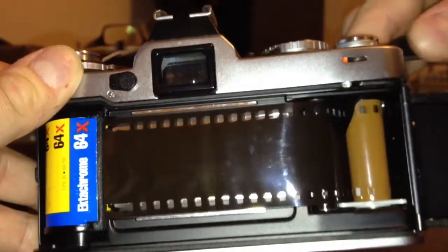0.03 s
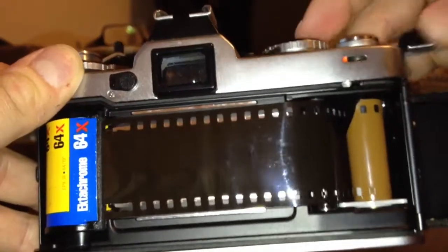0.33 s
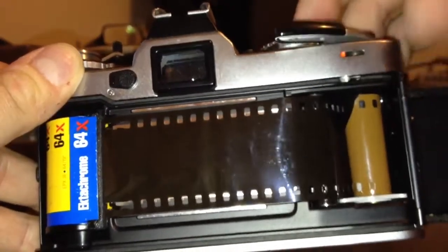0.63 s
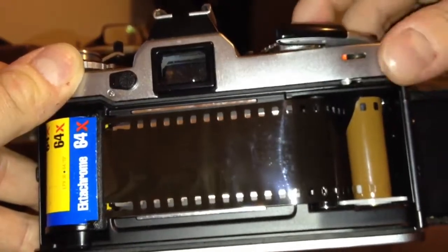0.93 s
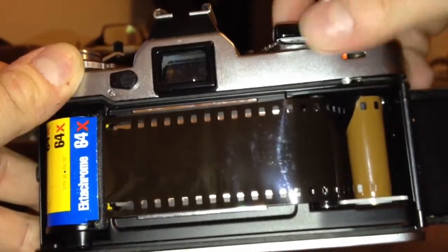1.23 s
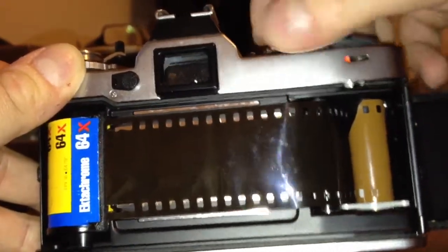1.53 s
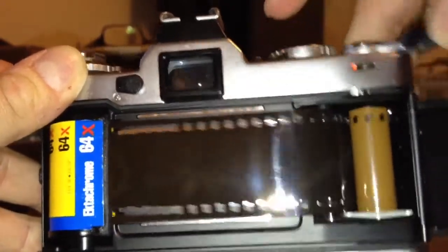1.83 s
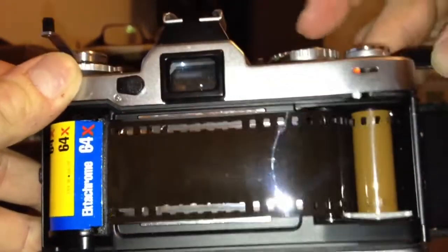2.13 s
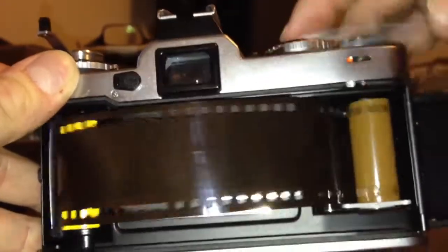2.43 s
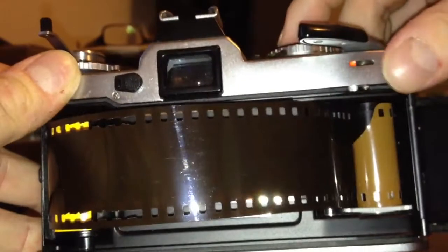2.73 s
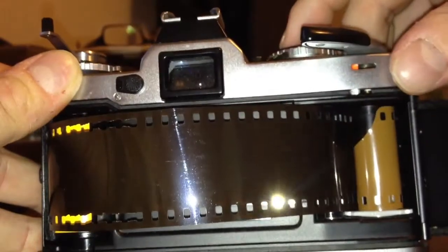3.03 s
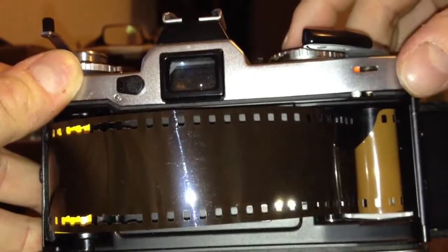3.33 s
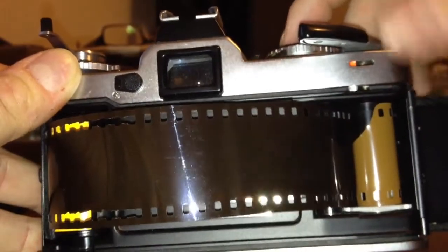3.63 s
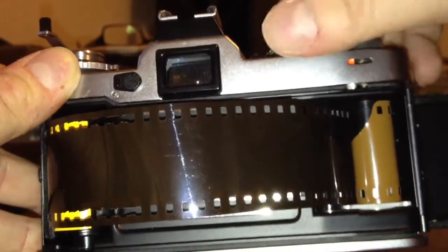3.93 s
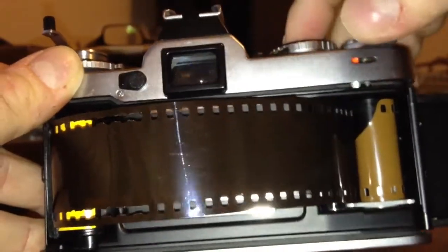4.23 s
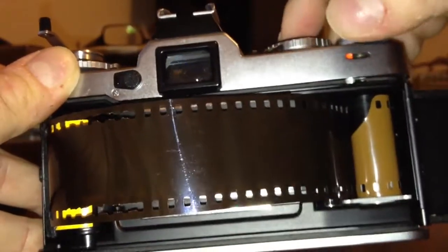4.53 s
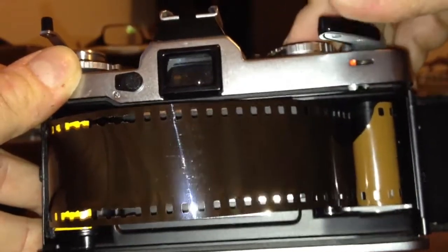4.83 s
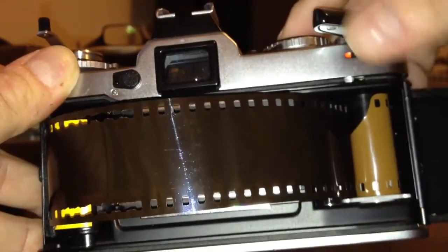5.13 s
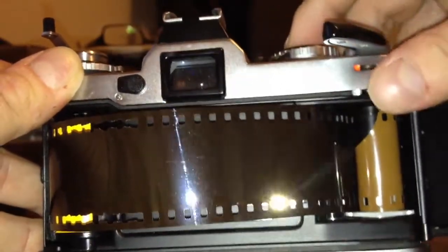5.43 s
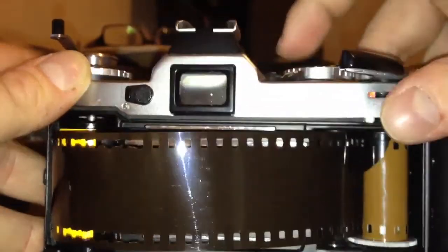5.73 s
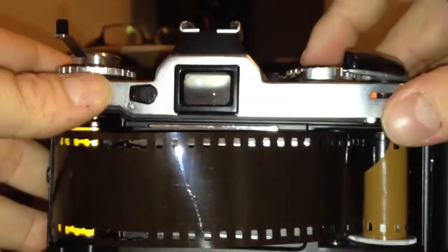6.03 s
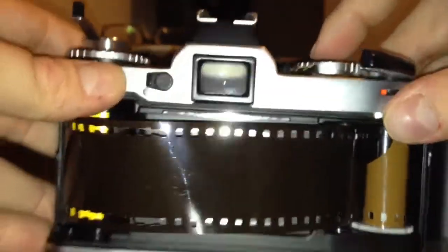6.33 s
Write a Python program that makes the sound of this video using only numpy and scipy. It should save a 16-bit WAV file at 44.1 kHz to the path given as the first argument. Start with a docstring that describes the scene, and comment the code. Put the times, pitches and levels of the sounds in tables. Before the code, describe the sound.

Close by in a small, quiet room, a film camera's winding lever whirrs and snaps, leaving a faint spring ring. The mirror clicks up and the shutter fires with a sharp clack. Winding follows, with ticking gears, softly hissing film and a rasping rattle from the cassette. After a lull the mirror and shutter fire again, then come finger bumps, a bright metallic ping and a last knock.

```python
"""Sharp clicks, short whirrs and a soft rasp: a film camera with its back open is wound and fired twice
by hand, close by in a small, quiet room. Latches, mirror and shutter curtains click as they strike the
frame, the plates and small steel parts. Gears whirr, springs ring, a dial pings, film slides over its
rails and jolts its cassette, and fingers bump the body."""
import sys
import numpy as np
from scipy import signal
from scipy.fft import rfft, irfft
from scipy.io import wavfile
from scipy.ndimage import uniform_filter1d

SR = 44100
rng = np.random.default_rng(int(sys.argv[2]) if len(sys.argv) > 2 else 0)


def digitize_waveform(pressure):
    """Quantize a signal to 16-bit integers and store it at the path in sys.argv[1].

    Rows of a 2-D input are taken as channels; values are limited to [-1, 1].
    """
    field = np.atleast_2d(pressure).T
    bounded = np.clip(field, -1, 1)
    quanta = np.round(bounded * 32767).astype(np.int16)
    wavfile.write(sys.argv[1], SR, quanta)


N = 291060
TIME = np.arange(N) / SR

# The tone colour of the room's hush and of sliding film: pitch_hz, relative_db
ROOM_COLOUR = [(18, -83), (30, -54.5), (85, -27.5), (110, -9.5), (216, -10), (267, -7), (384, -10),
               (426, -14), (524, -9.5), (662, -12.5), (928, -9.5), (2430, -25.5), (6880, -31.5),
               (10200, -34.5), (15000, -31.5)]
FILM_COLOUR = [(300, -14), (1000, 3), (2200, -0.5), (4700, -10), (6500, -3), (10300, -7), (11300, -2.5),
               (12400, -9), (15000, -12)]
# Faint hum and whine in the room: pitch_hz, width_hz, level_db
ROOM_HUM = [(123.7, 3.8, -73), (389, 5, -76), (534.2, 8.3, -68), (6900, 170, -86)]
# A mode is a pitch at which something likes to ring. These belong to the room's air and the camera's
# frame, plates, small steel parts and film cassette: pitch_hz, width_hz, gain_db
ROOM_MODES = [(138.5, 2, -2), (168, 5.5, 0.5), (201, 8.1, -11)]
FRAME_MODES = [(193.3, 63, -8), (329.7, 180, -9), (522, 240, -8.5), (706, 140, -3), (835, 90, -2.5),
               (968.4, 61, -1.5)]
PLATE_MODES = [(1296, 270, -2), (1632, 180, 0.5), (1974, 170, -1), (2230, 260, -2.5), (2597, 280, -2.5),
               (3180, 360, -6.5), (3900, 800, -7), (4682, 400, -4.5)]
STEEL_MODES = [(6150, 1400, -7), (6600, 270, -2), (7260, 350, -3), (8170, 520, -3.5), (8830, 470, -5.5),
               (10800, 1900, -7.5), (11860, 970, -1.5), (14300, 1300, -7), (15060, 1000, -8.5)]
CASSETTE_MODES = [(1434, 280, -6), (1995, 200, -0.5), (2584, 410, -3), (3490, 540, -7), (5670, 740, -9),
                  (7500, 1500, -11), (11660, 2100, -18)]
# Modes of the hand-held body: pitch_hz, fade_multiplier, gain_db
BODY_MODES = [(162, 0.99, -4.5), (214, 3.3, -5), (271, 1.5, -2), (375, 1, 0), (491, .6, -5), (577, 1, -2),
              (716, 0.56, -1), (865, 0.37, -7), (970, 0.94, -6.5), (1340, 0.36, -4), (1500, 0.73, -7)]

# The big moves (mirror goes up, shutter runs, winding lever hits its stop): start_s, gain_db
MIRROR_LIFTS = [(0.8348, -2), (4.7724, 2)]
SHUTTER_RUNS = [(0.993, -0.5), (4.9029, 0.13)]
LEVER_SNAPS = [(0.5005, 0.5), (2.4411, 1)]
# Loose parts ticking under the fingers: start_s, stop_s, ticks_per_s, level_db, centre_hz
LOOSE_TICKS = [(0.27, 0.47, 70, -60, 5660), (1.10, 1.20, 140, -60, 7600), (1.48, 1.61, 70, -57.5, 2400),
               (1.74, 1.98, 45, -50.5, 2300), (3.98, 4.04, 140, -63, 2180), (4.63, 4.66, 120, -64, 2780),
               (5.048, 5.13, 130, -58.5, 7200), (5.70, 5.786, 45, -52.5, 9500),
               (6.15, 6.45, 45, -56.5, 4730)]
# Film sliding on its rails, and dragging its cassette round: start_s, level_db, rise_s, hold_s, fall_s
FILM_SLIDES = [(1.60, -53, 0.066, 0.40, 0.076), (5.68, -55, 0.13, 0.022, 0.47),
               (6.17, -57.5, 0.13, 0.01, 0.22)]
CASSETTE_PULLS = [(2.25, -42.5, 0.038, 0.014, 0.049), (2.322, -38, 0.031, 0.088, 0.05),
                  (2.47, -55.5, 0.014, 0.05, 0.026)]
# The cassette bumping its chamber: start_s, level_db
CASSETTE_JOLTS = [(2.2835, -40), (2.288, -36), (2.3435, -31.5), (2.3512, -28.5), (2.362, -31.5),
                  (2.3861, -30.5), (2.4071, -30), (2.413, -33), (2.4252, -32), (2.4335, -23.5),
                  (2.490, -34.5), (2.5005, -39), (2.5041, -35), (2.5298, -36.5), (2.5402, -38),
                  (2.5445, -37)]
# Ringing metal (springs singing on, and the ping of a dial click): start_s, pitch_hz, level_db, fade_s
METAL_RINGS = [(0.502, 2309, -50, 0.92), (0.502, 1680, -51, 0.6), (0.502, 4597, -58, 0.22),
               (0.502, 6072, -50, 0.19), (1.028, 1007, -53, 0.33), (1.588, 2330, -52, 0.41),
               (4.081, 2309, -67.5, 0.73), (5.832, 1680, -21.5, 0.05), (5.832, 2630, -35, .025),
               (5.832, 4330, -32, 0.018), (5.832, 6350, -31, 0.02), (5.833, 6900, -28.5, 0.029),
               (6.311, 4600, -45, .17)]
# Fingers and lever bumping the body: start_s, base_level_db, centre_hz, base_fade_s
HAND_KNOCKS = [(0.836, -43, 198, 0.048), (1.995, -34, 260, 0.042), (2.091, -44.5, 136, 0.11),
               (4.178, -45.5, 260, .05), (5.617, -37.5, 225, 0.062), (5.642, -38.5, 305.4, 0.055),
               (5.664, -35, 188, 0.046), (5.819, -33.5, 194, 0.036), (5.898, -36, 195, 0.033),
               (6.2903, -22, 654, 0.078), (6.338, -38.5, 680, 0.2), (6.4553, -44.5, 550, 0.068)]
# The body's recoil in each shutter run: delay_s, base_level_db, centre_hz, base_fade_s
SHUTTER_KNOCKS = [(0.006, -38, 174, 0.08), (0.033, -41, 151.8, 0.13)]
# Gears turned by the lever: start_s, level_db, speed_up_s, run_down_s, steel_offset_db
WINDING_GEARS = [(0.318, -47, 0.013, 0.023, 3.5), (0.467, -48, 0.025, 0.0064, 5),
                 (0.501, -33.5, 0.0081, 0.036, -2.5), (2.000, -45.5, 0.0092, 0.043, -1.5),
                 (2.044, -37.5, 0.023, 0.03, -0.5), (2.441, -42.5, 0.0085, 0.024, -4)]
# Gears in each mirror lift and shutter run: delay_s, then the same columns
MIRROR_GEARS = [(0.006, -37.5, 0.025, 0.03, 3.5)]
SHUTTER_GEARS = [(-0.002, -31, 0.018, 0.015, 5.5), (0.027, -31, 0.013, 0.03, 0),
                 (0.067, -41, 0.01, 0.028, -3.5)]
# Lever, ratchet and dial clicks: start_s, base_level_db, frame_offset_db, steel_offset_db, base_fade_s
SINGLE_CLICKS = [(0.0054, -35, -11, 5.5, 0.13), (0.0125, -48, 0.5, 25, 0.0046),
                 (0.0338, -36.5, -1, 9, 0.05), (0.3139, -37, -13, -6.5, 0.04),
                 (0.3369, -54.5, 9.5, 10.5, 0.016), (0.5196, -24.5, -13.5, 2.5, 0.0079),
                 (1.2052, -48.5, -10, 3, 0.019), (1.6135, -46, -2, -1, 0.0098),
                 (1.6307, -37, -15, 0, 0.012), (1.646, -48, 1.5, 10, 0.016), (1.686, -38, -13, -0.5, 0.021),
                 (1.6953, -32.5, -11, -6, 0.03), (1.733, -45, 1, 7.5, 0.012),
                 (1.8851, -43, -4.5, -20, 0.022), (1.9922, -33, -9, 0.5, 0.0058),
                 (1.9951, -25.5, -6.5, -9.5, 0.04), (2.0561, -34, -2.5, -8, 0.053),
                 (2.0724, -37, -17, 16.5, 0.016), (2.0891, -34.5, 1.5, 6, 0.031),
                 (2.3153, -53.5, 0, 14, 0.01), (2.3713, -42.5, -5, 4.5, 0.008),
                 (4.0495, -44.5, -7, -1.5, 0.03), (4.0786, -38, -5.5, -0.5, 0.011),
                 (4.1775, -52, 10, -16, 0.0067), (4.667, -40.5, -6.5, -2, 0.015),
                 (4.6883, -52.5, -10, 9, 0.0047), (5.128, -49, -9, 0, 0.026), (5.6425, -48, 3, -6, 0.0057),
                 (5.77, -52.5, -20, 9, 0.039), (5.8312, -25.5, -24, -10.5, 0.013),
                 (6.062, -40.5, -16.5, -27, 0.0048), (6.1233, -39, -10.5, -17, 0.0057),
                 (6.235, -55, -7, 8, 0.012), (6.306, -33, -0.5, -4.5, 0.024), (6.3932, -49, -29, 0, 0.029),
                 (6.4307, -50, -18, -42, 0.02), (6.557, -57, 4.5, -4, 0.024)]
# The hits inside each big move: delay_s, then the same columns
MIRROR_HITS = [(0.0, -27.5, -1, 6.5, 0.025), (0.009, -37, -9, 3.5, 0.044), (0.0285, -32, -8.5, -4, 0.03)]  # release, rebound, landing
SHUTTER_HITS = [(-0.0286, -31, -4.5, 1.5, 0.019), (0.0, -21, -6.5, 2.5, 0.0125),
                (0.0129, -18, -11, 2, 0.012), (0.0272, -22.5, -6, 4, 0.045), (0.0349, -26.5, 1.5, 8, 0.045),
                (0.0417, -33, -5, -5, 0.026), (0.0566, -24, -7.5, -3.5, 0.022),
                (0.0807, -35.5, -4.5, -9, 0.0068)]  # latch, two curtains, the mirror falling and bouncing
LEVER_HITS = [(-0.0043, -27, -31.5, 4.5, 0.013), (-0.0001, -24, -12.5, 9, 0.018)]  # ratchet catch, then stop


def gain(db):
    """Turn decibels into a number to multiply by."""
    return 10 ** (np.asarray(db) / 20)


def unit(x):
    """Scale a sound to an average strength (rms) of 1."""
    return x / np.sqrt(np.mean(x ** 2))


def fade(t, fade_s):
    """Die away, dropping 60 dB in fade_s."""
    return np.exp(-np.log(1000) * t / fade_s)


def add(out, start_s, x):
    """Mix x into out at start_s."""
    i = max(int(start_s * SR), 0)
    out[i:i + len(x)] += x[:max(N - i, 0)]


def resonate(x, modes):
    """Let x ring a set of modes; neighbours swing opposite ways."""
    out = 0
    for k, (hz, width, db) in enumerate(modes):
        b, a = signal.iirpeak(hz, hz / width, fs=SR)
        out = out + (-1) ** k * gain(db) * signal.lfilter(b, a, x)
    return out


def struck(modes, centre_hz, octaves):
    """The spot that is hit favours the modes near centre_hz."""
    return [(hz, width, db - 3 * (np.log2(hz / centre_hz) / octaves) ** 2) for hz, width, db in modes]


def blow(x, db):
    """Give a hit as much energy as 5 ms of steady sound at this level."""
    return x * gain(db) * np.sqrt(0.005 * SR / np.sum(x ** 2))


def noise(colour):
    """Steady noise with the given tone colour."""
    hz, db = np.transpose(colour)
    bins_hz = np.maximum(np.arange(N // 2 + 1) * SR / N, 1)
    shape = gain(np.interp(np.log(bins_hz), np.log(hz), db))
    return unit(irfft(rfft(rng.standard_normal(N)) * shape, N))


def impacts(per_s, scatter_db):
    """Tiny taps of uneven size at random times."""
    chance, size = rng.random(N), rng.standard_normal(N)
    return (chance < per_s / SR) * np.sign(size) * gain(np.abs(scatter_db * size))


def repeat(pattern, moves):
    """Place a copy of a pattern at every move, adding that move's gain."""
    return [(start + delay, move_db + db, *rest)
            for start, move_db in moves for delay, db, *rest in pattern]


def ramp(start_s, delays_s, levels_db):
    """A loudness curve joining points in decibels, silent before and after."""
    return gain(np.interp(TIME - start_s, delays_s, levels_db, left=-np.inf, right=-np.inf))


def swells(strokes, ends_db=-20):
    """The loudness of rubbing strokes: each rises, holds and falls."""
    return sum(gain(db) * ramp(start, np.cumsum([0, rise, hold, fall]), [ends_db, 0, 0, ends_db])
               for start, db, rise, hold, fall in strokes)


def room_tone(hush_db=-62.5):
    """The room's steady hush, with a faint hum and whine."""
    hum = sum(gain(db) * unit(resonate(rng.standard_normal(N), [(hz, width, 0)]))
              for hz, width, db in ROOM_HUM)
    return noise(ROOM_COLOUR) * gain(hush_db) + hum


def room_echo(x, early_db=-15, late_db=-23, split_hz=3000, gap_s=0.0065):
    """Sound bounces off nearby surfaces, then leaves a faint tail whose treble dies first."""
    t = TIME[:SR // 2]
    near, far = rng.standard_normal((2, len(t)))
    low = signal.sosfilt(signal.butter(2, split_hz, fs=SR, output="sos"), far)
    early = near * fade(t, fade_s=0.079)
    late = low * fade(t, fade_s=0.44) + (far - low) * fade(t, fade_s=0.29)
    echoes = gain(early_db) * early / np.linalg.norm(early) + gain(late_db) * late / np.linalg.norm(late)
    out = np.zeros(N)
    add(out, gap_s, signal.fftconvolve(x, echoes)[:N])
    return out


def loose_ticks(fade_s=0.027, scatter_db=3.0):
    """Slightly loose parts tick faintly at random under the fingers."""
    out, t = np.zeros(N), TIME[:1024]
    for start, stop, per_s, db, centre_hz in LOOSE_TICKS:
        modes = struck(PLATE_MODES + STEEL_MODES, centre_hz, octaves=0.8)
        ticks_now = (rng.random(N) < per_s / SR) & (TIME > start) & (TIME < stop)
        for tick_s in TIME[ticks_now]:
            tick = resonate(rng.standard_normal(len(t)) * fade(t, fade_s), modes)
            add(out, tick_s, blow(tick, db + scatter_db * rng.standard_normal()))
    return out


def film_hiss(grip_db=2.5):
    """Film hisses over the rails, catching and slipping a little."""
    grip = unit(uniform_filter1d(rng.standard_normal(N), size=160))
    return noise(FILM_COLOUR) * swells(FILM_SLIDES) * gain(grip_db * grip)


def cassette_scrape(frame_db=-14):
    """The cassette sticks and slips, rasping through its thin shell and faintly through the frame."""
    slips = impacts(per_s=5000, scatter_db=3)
    shell = unit(resonate(slips, CASSETTE_MODES))
    frame = unit(resonate(slips, FRAME_MODES))
    return (shell + gain(frame_db) * frame) * swells(CASSETTE_PULLS)


def cassette_jolts(fade_s=0.0097, rise_s=0.0007, frame_db=-17):
    """Each jolt is a short rattle that rings the cassette shell and nudges the frame."""
    out, t = np.zeros(N), TIME[:2048]
    shell_modes = struck(CASSETTE_MODES, centre_hz=2950, octaves=0.98)
    for start, db in CASSETTE_JOLTS:
        force = rng.standard_normal(len(t)) * fade(t, fade_s) * (1 - np.exp(-t / rise_s))
        add(out, start, blow(resonate(force, shell_modes), db))
        add(out, start, blow(resonate(force, FRAME_MODES), db + frame_db))
    return out


def ringing_metal():
    """Metal rings in fading pure tones: springs sing on, and a dial click gives a brief bright ping."""
    out, t = np.zeros(N), TIME[:SR]
    for start, hz, db, fade_s in METAL_RINGS:
        add(out, start, gain(db) * np.sin(2 * np.pi * hz * t) * fade(t, fade_s))
    return out


def body_knocks(detune=0.05, boost_db=2.0, bass_cut_hz=135):
    """Soft bumps ring the body's low modes; the hand's grip shifts their pitch a little each time."""
    out, t = np.zeros(N), TIME[:8192]
    for start, db, centre_hz, fade_s in repeat(SHUTTER_KNOCKS, SHUTTER_RUNS) + HAND_KNOCKS:
        modes = struck(BODY_MODES, centre_hz, octaves=0.68)
        shifts = 1 + detune * rng.standard_normal(len(modes))
        ring = sum(gain(mode_db) * np.sin(2 * np.pi * hz * shift * t) * fade(t, fade_s * multiplier)
                   for (hz, multiplier, mode_db), shift in zip(modes, shifts))
        add(out, start, blow(-ring, db + boost_db))
    # the body is too small to push out deep bass
    return signal.sosfilt(signal.butter(3, bass_cut_hz, "high", fs=SR, output="sos"), out)


def gears(ends_db=-11, frame_db=-6):
    """Tapping gear teeth blur into a whirr that swells and fades as the gears speed up and stop."""
    teeth = impacts(per_s=4500, scatter_db=2.5)
    drive, steel_drive = np.zeros(N), np.zeros(N)
    runs = repeat(MIRROR_GEARS, MIRROR_LIFTS) + repeat(SHUTTER_GEARS, SHUTTER_RUNS) + WINDING_GEARS
    for start, db, up, down, steel_db in runs:
        swell = gain(db) * ramp(start, [0, up, up + down], [ends_db, 0, ends_db])
        drive = np.maximum(drive, swell)
        steel_drive = np.maximum(steel_drive, swell * gain(steel_db))
    parts = [(FRAME_MODES, drive * gain(frame_db)), (PLATE_MODES, drive), (STEEL_MODES, steel_drive)]
    return sum(resonate(teeth * push, modes) / np.std(resonate(teeth, modes)) for modes, push in parts)


def clicks(frame_trim_db=-1.0, plate_trim_db=-0.6, steel_trim_db=-1.37, fade_scale=0.8, rise_s=0.0012):
    """Each hit dies away in a rattle of tiny bounces that rings the frame, plates and steel parts."""
    out, t = np.zeros(N), TIME[:4096]
    bass_cut = signal.butter(2, 1050, "high", fs=SR, output="sos")  # small plates give off little bass
    hits = (repeat(MIRROR_HITS, MIRROR_LIFTS) + repeat(SHUTTER_HITS, SHUTTER_RUNS)
            + repeat(LEVER_HITS, LEVER_SNAPS) + SINGLE_CLICKS)
    for start, db, frame_db, steel_db, fade_s in hits:
        plate_hz = 1886 * 2 ** (-0.02 * frame_db)  # sparing the frame rings the plates higher
        steel_hz = min(8200 * 2 ** (0.026 * steel_db), 9600)  # favouring the steel rings it higher
        force = rng.standard_normal((3, len(t))) * fade(t, fade_s * fade_scale)
        force *= 1 - np.exp(-t / rise_s)
        force[:, 0] += 0.22  # the first touch
        frame = resonate(force[0], FRAME_MODES)
        plates = resonate(signal.sosfilt(bass_cut, force[1]), struck(PLATE_MODES, plate_hz, octaves=0.6))
        steel = resonate(force[2], struck(STEEL_MODES, steel_hz, octaves=0.57))
        add(out, start, blow(frame, db + frame_db + frame_trim_db))
        add(out, start, blow(plates, db + plate_trim_db))
        add(out, start, blow(steel, db + steel_db + steel_trim_db))
    return out


def scene():
    """The quiet room, the camera and its echoes, in one channel."""
    background = room_tone()
    camera = (clicks() + gears() + cassette_scrape() + cassette_jolts()
              + body_knocks() + ringing_metal() + film_hiss())
    room = room_echo(camera) + resonate(camera, ROOM_MODES)
    return (background + room + loose_ticks() + camera)[None]


def record(dry, bass_hz=105, top_hz=15400):
    """A small microphone drops the deep bass and the very highest treble."""
    thin = signal.sosfilt(signal.butter(3, bass_hz, "high", fs=SR, output="sos"), dry)
    return signal.sosfilt(signal.ellip(10, 0.2, 70, top_hz, fs=SR, output="sos"), thin)


dry = scene()
out = record(dry)
digitize_waveform(out)
```